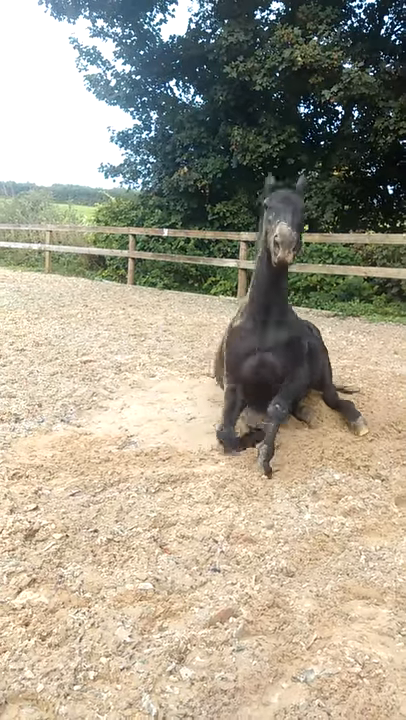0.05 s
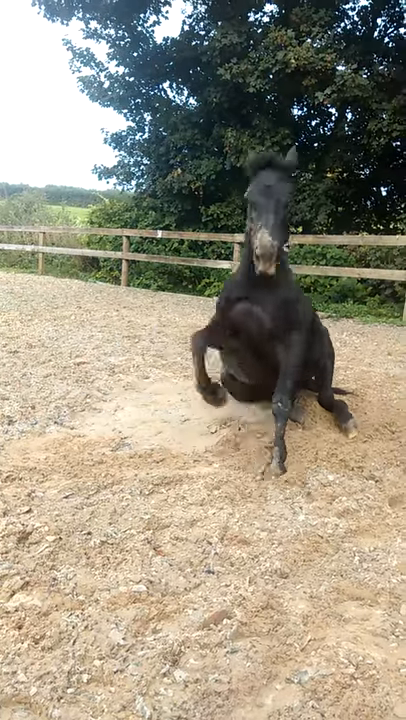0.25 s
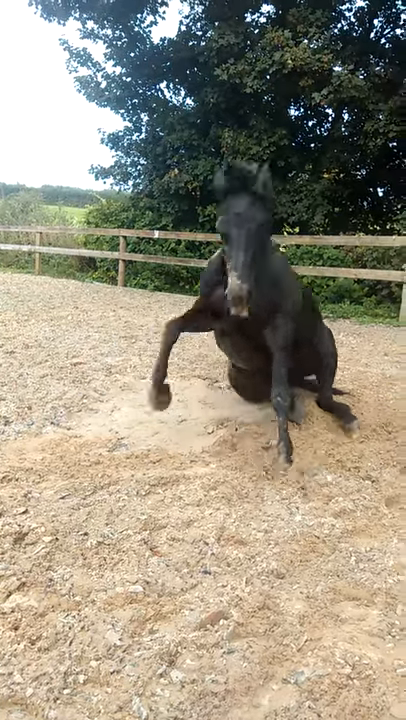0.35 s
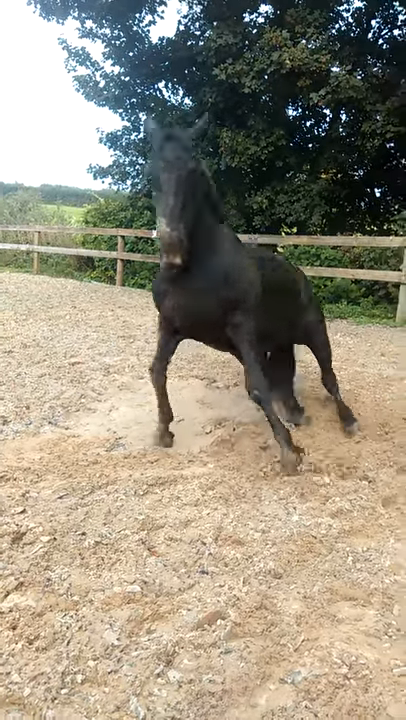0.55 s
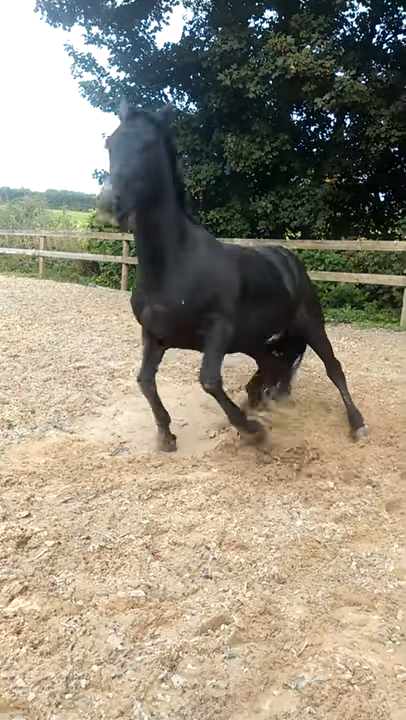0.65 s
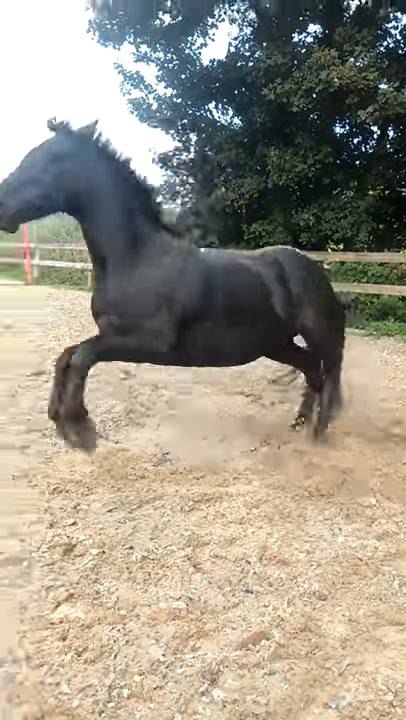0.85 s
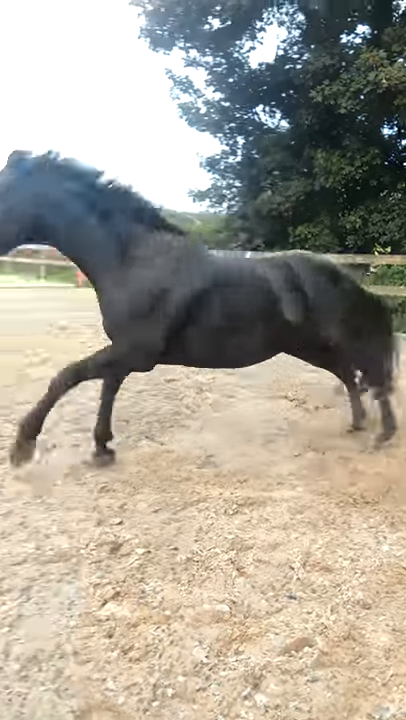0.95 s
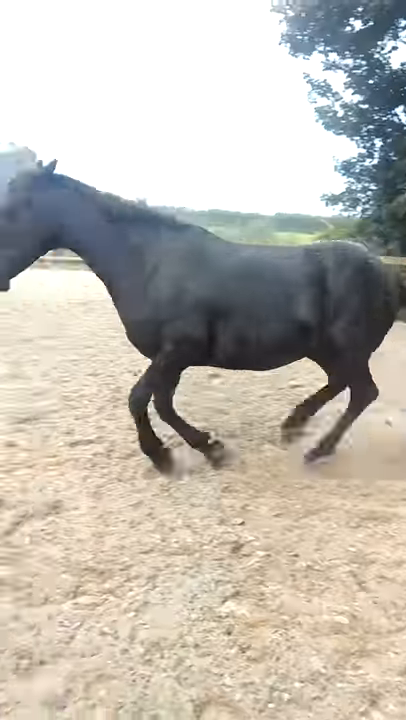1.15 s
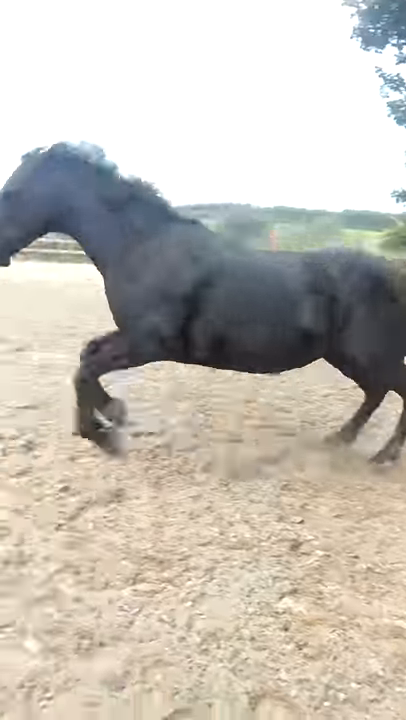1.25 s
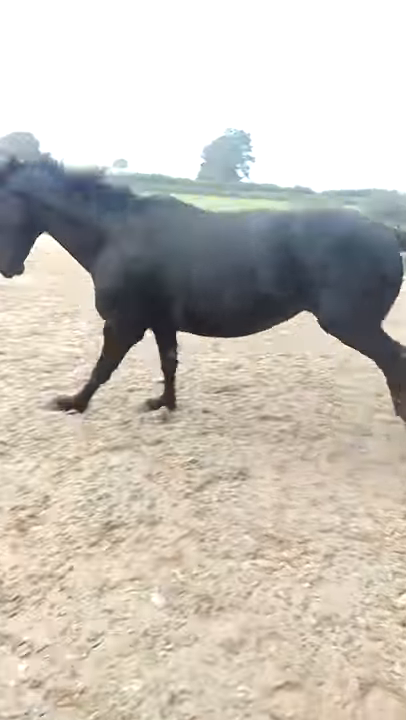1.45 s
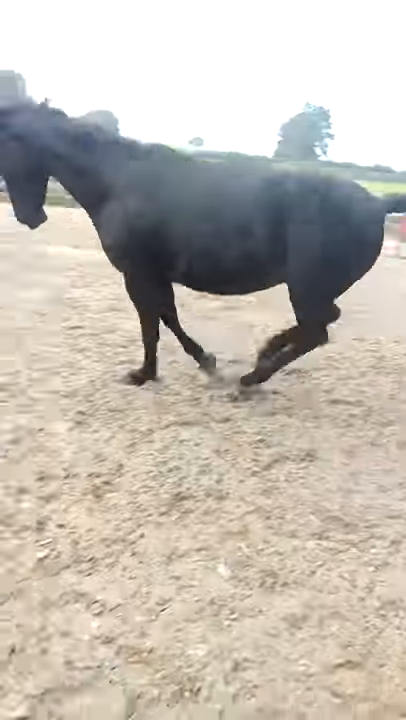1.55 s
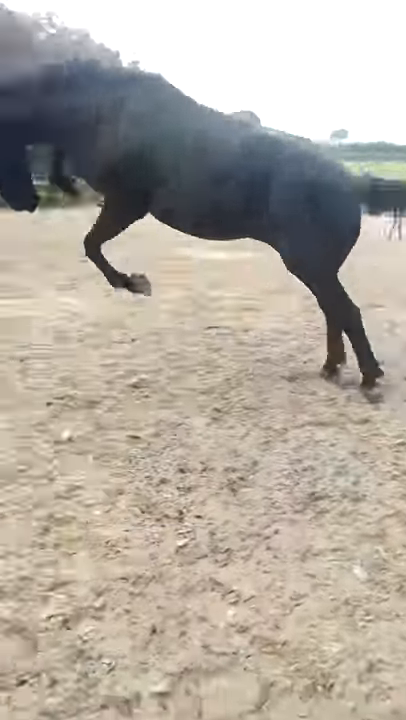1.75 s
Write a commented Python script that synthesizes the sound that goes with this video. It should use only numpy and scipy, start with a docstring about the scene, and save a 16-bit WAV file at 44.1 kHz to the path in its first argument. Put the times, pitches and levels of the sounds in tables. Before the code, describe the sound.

A horse squeals briefly, its whistling voice turning into a rough, breathy grunt. Dull, uneven hoofbeats follow as it canters past the microphone in an outdoor sand arena, with spraying grains and a few small stone ticks.

```python
"""Horse squeal and canter

A horse squeals as it heaves itself up in a sandy arena, then canters past. The squeal is a high
laryngeal whistle that breaks into a rasping grunt of slow vocal-fold pulses and thins to a whistle
again. Each hoof thumps the ground, crunches the sand and throws up grains; a few knock small stones."""
import sys
import numpy as np
from scipy import signal
from scipy.fft import rfft, irfft
from scipy.io import wavfile
from scipy.ndimage import uniform_filter1d

SR = 44100
rng = np.random.default_rng(int(sys.argv[2]) if len(sys.argv) > 2 else 0)


def unload_wav(signal):
    """Save mono or channel-first audio to the path in sys.argv[1] as 16-bit WAV at rate SR, clipped to [-1, 1]."""
    wavfile.write(
        sys.argv[1],
        SR,
        np.round(np.clip(np.atleast_2d(signal).T, -1, 1) * 32767).astype(np.int16),
    )


N = 79380
T_S = np.arange(N) / SR
BINS_HZ = np.maximum(np.arange(N // 2 + 1) * SR / N, 1e-3)


def undb(db):
    return 10 ** (np.asarray(db) / 20)


def unit(x):
    return x / np.sqrt(np.mean(x ** 2) + 1e-18)


def curve(table, column=1):
    rows = np.array(table)
    return np.interp(T_S, rows[:, 0], rows[:, column])


def swell(table, column=1):
    """Gain from a dB column, silent outside the table."""
    inside = (T_S > table[0][0]) & (T_S < table[-1][0])
    return undb(curve(table, column)) * uniform_filter1d(inside * 1., size=130)


def steady(x):
    """Hold short-term RMS at 1."""
    power = uniform_filter1d(uniform_filter1d(x ** 2, size=900), size=900)
    return x / np.sqrt(np.abs(power) + 1e-12)


def over_hz(points):
    rows = np.array(points)
    return np.interp(np.log(BINS_HZ), np.log(rows[:, 0]), rows[:, 1])


def filtered(x, response):
    return irfft(rfft(x) * response, N)


def colour(x, spectrum):
    return filtered(x, undb(over_hz(spectrum)))


def resonance(hz, width_hz):
    """Two identical band-passes in series."""
    return 1 / (1 + 1j * (BINS_HZ ** 2 - hz ** 2) / (BINS_HZ * width_hz)) ** 2


def lowpass(hz):
    return 1 / np.sqrt(1 + (BINS_HZ / hz) ** 16)


def wobble(hz):
    """Smooth noise up to hz, RMS 1."""
    return unit(filtered(rng.standard_normal(N), 1 / (1 + (BINS_HZ / hz) ** 4)))


def stereo_noise(spectrum, width, spread_db=0):
    """Coloured mid/side noise; spread_db makes it grainy."""
    mid, side = rng.standard_normal((2, N))
    pair = mid + width * side * np.array([[1], [-1]])
    return unit(colour(pair * undb(spread_db * wobble(hz=900)), spectrum))


# ambient spectrum: f/Hz, gain/dB
FIELD_SPECTRUM = [(25, 6.5), (2130, -23.5), (3180, -35), (15000, -30.5)]


def field_air(level_db=-56):
    """Quiet air of open fields."""
    return undb(level_db) * stereo_noise(FIELD_SPECTRUM, width=0.27)


# rasp envelope: t/s, level/dB
RASP_LEVEL = [(.19, -54), (.255, -68), (.266, -29.5), (.315, -32.5), (.495, -35.5), (.52, -41.5),
              (.605, -50.5), (.65, -39.5), (.68, -47.5)]
# open-mouth formants: f/Hz, gain/dB
OPEN_FORMANTS = [(1130, 4), (1900, 2), (3080, -25), (6150, 4)]
# closing-mouth formants: f/Hz, gain/dB
CLOSING_FORMANTS = [(840, -22), (1680, 6.5), (3080, -1.5), (4850, -8.5)]
# breath spectrum: f/Hz, gain/dB
BREATH_SPECTRUM = [(900, 0), (6500, -15.5), (7600, -29.5)]


def rasp(puff, close_at_s=0.385, move_s=0.042, mouth_q=18, low_cut_hz=658):
    """Air hisses through the closing mouth, one puff per fold opening."""
    air = rng.standard_normal(N)
    wide, narrow = (filtered(air, sum(undb(db) * np.abs(resonance(hz, hz / mouth_q)) for hz, db in mouth))
                    for mouth in (OPEN_FORMANTS, CLOSING_FORMANTS))
    closed = np.clip(.5 + (T_S - close_at_s) / move_s, 0, 1)
    breath = (1 - closed) * wide + closed * narrow + colour(air, BREATH_SPECTRUM)
    return steady(filtered(breath, 1 - lowpass(low_cut_hz))) * puff * swell(RASP_LEVEL)


def whistle(table, fold_cycles, rough=.58, harmonics_db=(0,), jitter=0.0547, flutter=0.96, pull=0.045):
    """Laryngeal tone; roughness adds flutter and the pull of the slow folds, and weakens overtones."""
    beat = np.cos(2 * np.pi * fold_cycles)
    hz = curve(table) * (1 + rough * (jitter * wobble(hz=387) + pull * beat))
    phase = 2 * np.pi * np.cumsum(hz) / SR
    tone = 0
    for k, db in enumerate(harmonics_db):
        gain = undb(db) * (1 - rough ** 2) ** (k / 2)
        tone += gain * np.sin((k + 1) * phase) * (1 + rough * flutter * wobble(hz=98))
    return steady(tone) * (1 + .5 * rough * beat) * swell(table, column=2)


# squeaks: t/s, length/s, f/Hz, level/dB
VOICE_CRACKS = [(0.194, 0.0235, 1490, -39.5), (.481, 0.021, 1510, -29.5), (1.072, 0.0445, 1040, -48)]


def cracks(fold_cycles):
    """Brief squeaks where the voice cracks."""
    return sum(whistle([(start, hz, db), (start + length, hz, db)], fold_cycles,
                       harmonics_db=(-14.5, 8.5, 2))
               for start, length, hz, db in VOICE_CRACKS)


# opening whistle: t/s, f/Hz, level/dB
SQUEAL_CONTOUR = [(.204, 900, -60), (.216, 925, -43), (.221, 1010, -33), (.23, 985, -36.5),
                  (.252, 1050, -29), (.275, 1035, -27), (.35, 1000, -36), (.40, 942.4, -37.5),
                  (.52, 850, -41)]
# its break-up: t/s, roughness/0-1
SQUEAL_ROUGHNESS = [(.25, .45), (.28, .62), (.4, .72)]


def squeal(fold_cycles):
    """Overtone-rich whistle that grows rough."""
    rough = curve(SQUEAL_ROUGHNESS)
    return whistle(SQUEAL_CONTOUR, fold_cycles, rough, harmonics_db=(-2, -7, 4, -4.5, -14, -1))


# hiss spectrum: f/Hz, gain/dB
HISS_SPECTRUM = [(3000, -11), (6500, -4), (15500, -14)]


def breath_hiss(peak_s=.41, sigma_s=0.12, level_db=-50):
    """Wide hiss that swells and fades with the push of air."""
    push = np.exp(-((T_S - peak_s) / sigma_s) ** 2 / 2)
    return undb(level_db) * push * stereo_noise(HISS_SPECTRUM, width=1)


# grunt envelopes: t/s, chest level/dB, throat level/dB
GRUNT_LEVELS = [(.255, -100, -39), (.30, -36, -24.5), (.385, -28.5, -25), (.45, -28, -31),
                (.535, -36.5, -31), (.60, -55.5, -44.5), (.655, -62, -38), (.68, -52, -52)]


def grunt(fold_cycles, puff, shimmer_db=2, breathiness=0.8, leak_db=-4):
    """Each fold closure thumps the chest and rings the throat."""
    closures = np.floor(fold_cycles)
    pulses = np.diff(closures, prepend=closures[0]) * undb(-shimmer_db * wobble(hz=53))
    source = steady(pulses) + breathiness * puff * rng.standard_normal(N)
    chest = filtered(source, resonance(hz=94.7, width_hz=55))
    chest_leak = undb(leak_db) * resonance(hz=187.7, width_hz=57)
    throat = filtered(source, (resonance(hz=349, width_hz=98) + chest_leak) * lowpass(hz=438))
    return -steady(chest) * swell(GRUNT_LEVELS) - steady(throat) * swell(GRUNT_LEVELS, column=2)


# upper whistle: t/s, f/Hz, level/dB
HIGH_CONTOUR = [(.28, 2470, -29), (.36, 2355, -64), (.41, 2330, -36.5), (.54, 2154, -55.5),
                (.62, 2090, -48), (.657, 2000, -41.5), (.677, 1929, -56)]
# closing whistle: t/s, f/Hz, level/dB
WHINE_CONTOUR = [(.552, 1060, -41), (.59, 1000, -49), (.68, 1036, -52)]


def thin_whistles(fold_cycles):
    """A high sinking tone and the closing whine, both without overtones."""
    return whistle(HIGH_CONTOUR, fold_cycles) + whistle(WHINE_CONTOUR, fold_cycles)


# vocal-fold pulse rate: t/s, f/Hz
FOLD_RATE = [(.255, 185.7), (.305, 172.1), (.325, 90.26), (.42, 58.34), (.485, 56.83), (.57, 158.5)]


def voice(jitter=0.0369, puff_depth=.62):
    """Slow vocal folds drive the grunt and modulate rasp and whistles."""
    fold_hz = curve(FOLD_RATE) * (1 + jitter * wobble(hz=40)) * (T_S > FOLD_RATE[0][0])
    cycles = np.cumsum(fold_hz) / SR
    puff = unit(np.exp(puff_depth * np.cos(2 * np.pi * (cycles - .15))))
    return grunt(cycles, puff) + rasp(puff) + cracks(cycles) + squeal(cycles) + thin_whistles(cycles)


# voice phase, left minus right: f/Hz, phase/rad
STEREO_PHASE = [(150, 0), (500, -.4), (1650, -2.9), (2240, -7.6), (3000, -8.4), (15000, -37)]
# voice balance, left minus right: f/Hz, level/dB
STEREO_BALANCE = [(400, 1.5), (2400, -7), (7000, -9)]


def place_with_echo(mono, echo_db=-21, decay_s=0.17):
    """Sound arrives on the right first; the trees add a faint echo."""
    pan = undb(over_hz(STEREO_BALANCE) / 2)
    left_lead = np.interp(BINS_HZ, *np.array(STEREO_PHASE).T)
    direct = filtered(mono, np.array([pan * np.exp(1j * left_lead), 1 / pan]))
    tail = rng.standard_normal((2, N)) * np.exp(-T_S / decay_s)
    echo = filtered(mono, rfft(unit(tail)) / np.sqrt(N))
    return direct + undb(echo_db) * echo


def impact(start, db, decay_s, contact_s=0.00037):
    """Envelope of a knock: fast rise, exponential decay."""
    age = np.maximum(T_S - start, 0)
    return undb(db) * (1 - np.exp(-age / contact_s)) * np.exp(-age / decay_s)


def thump(start, hz, lag_s=0.00379, rise_cycles=0.67, bend_s=0.0018):
    """Low pulse that sinks in pitch as the hoof digs in."""
    age = np.maximum(T_S - start - lag_s, 0)
    rise = age * hz / rise_cycles
    push = (rise * np.exp(1 - rise)) ** 2
    cycles = hz * (age + bend_s * (1 - np.exp(-age / bend_s)))
    return -push * np.cos(2 * np.pi * cycles)


# sand spray: t/s, level/dB
SPRAY_LEVEL = [(.88, -61.5), (1.0, -45), (1.27, -51.5), (1.42, -54), (1.66, -51), (1.76, -60)]
# grain spectrum: f/Hz, gain/dB
GRIT_SPECTRUM = [(900, 9), (6000, -1), (7500, -14), (15500, -19.5)]


def sand(grit):
    """Sharp bursts of grit over sand thrown and dragged by the legs."""
    return (grit + undb(curve(SPRAY_LEVEL))) * stereo_noise(GRIT_SPECTRUM, width=1, spread_db=2.5)


# hoof falls: t/s, thump f/Hz, thump level/dB, crunch level/dB, grit level/dB
HOOF_FALLS = [(.713, 142, -42, -43.5, -44), (0.763, 104, -35, -47.5, -73), (0.821, 147, -33, -35, -38.5),
              (0.943, 178.4, -12.5, -40, -44), (1.006, 162, -26, -30, -46.5),
              (1.095, 113.6, -19, -24.5, -29.5), (1.139, 174, -32, -37, -75), (1.174, 116, -27.5, -35, -36),
              (1.230, 137, -20, -28.5, -40), (1.265, 125, -19.5, -30.5, -40),
              (1.466, 141.4, -20, -29, -38.5), (1.529, 131, -22, -24.5, -29), (1.611, 127.5, -36, -41, -54),
              (1.657, 115, -34, -45.5, -53), (1.700, 187, -31, -43, -54)]
# crushed-sand spectrum: f/Hz, gain/dB
CRUNCH_SPECTRUM = [(100, -7), (360, 2.5), (620, -14), (1100, -12), (12000, -75)]
# ground-rumble spectrum: f/Hz, gain/dB
RUMBLE_SPECTRUM = [(25, -12), (110, 0), (7000, -76)]


def hooves(rumble_gain_db=-17):
    """Each hoof thumps, crunches sand, throws grit and briefly shakes the ground."""
    thumps, crunch, grit, rumble_power = np.zeros((4, N))
    for start, hz, thump_db, crunch_db, grit_db in HOOF_FALLS:
        thumps += undb(thump_db) * thump(start, hz)
        crunch += impact(start, crunch_db, decay_s=0.01)
        grit += impact(start, grit_db, decay_s=0.0059)
        rumble_power += impact(start, thump_db + rumble_gain_db, decay_s=0.04) ** 2
    grains = sand(grit) + crunch * stereo_noise(CRUNCH_SPECTRUM, width=0.18, spread_db=6)
    rumble = np.sqrt(rumble_power) * stereo_noise(RUMBLE_SPECTRUM, width=0.1)
    return thumps + grains + rumble


# stone ticks: t/s, f/Hz, level/dB
PEBBLE_TICKS = [(1.035, 1180, -45.5), (1.239, 4800, -42), (1.291, 4520, -45.5), (1.476, 5200, -41.5)]


def pebbles(q=2.44):
    """Small stones knocked by the hooves, each at its own pitch."""
    ticks = 0
    for start, hz, db in PEBBLE_TICKS:
        ring = steady(filtered(rng.standard_normal(N), resonance(hz, hz / q)))
        ticks += ring * impact(start, db, decay_s=0.0059)
    return ticks


def scene():
    """The horse over quiet open air."""
    return place_with_echo(voice()) + breath_hiss() + hooves() + pebbles() + field_air()


def record(dry, top_hz=15700):
    """Steep elliptic low-pass."""
    return signal.sosfilt(signal.ellip(10, .2, 80, top_hz, fs=SR, output="sos"), dry)


dry = scene()
out = record(dry)
unload_wav(out)
```